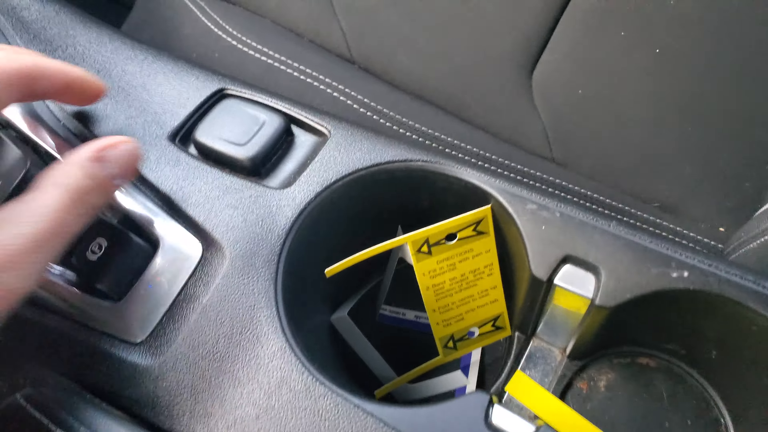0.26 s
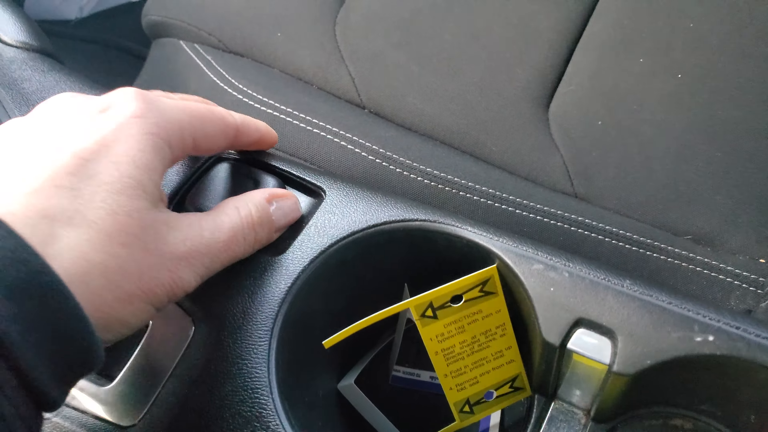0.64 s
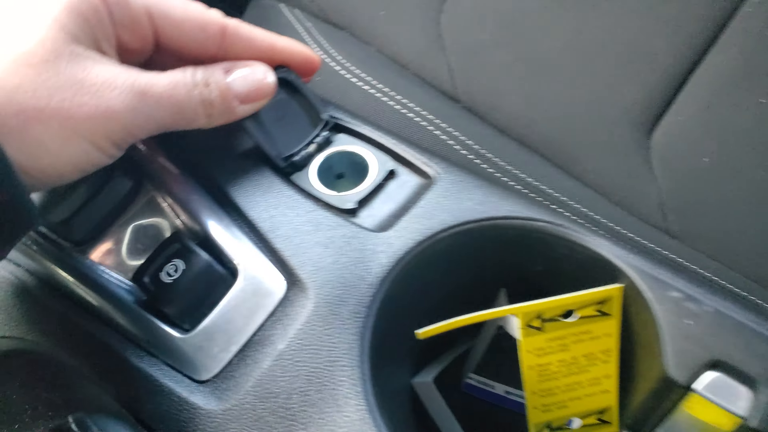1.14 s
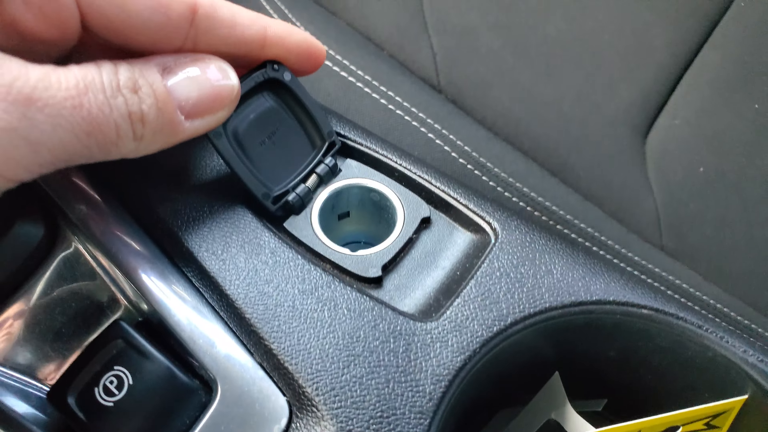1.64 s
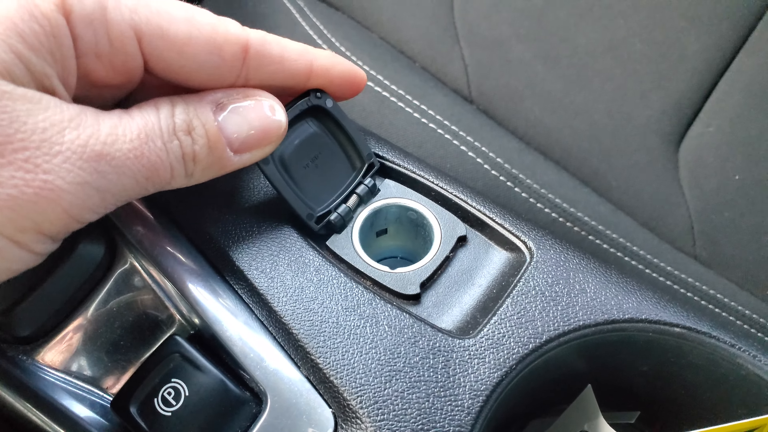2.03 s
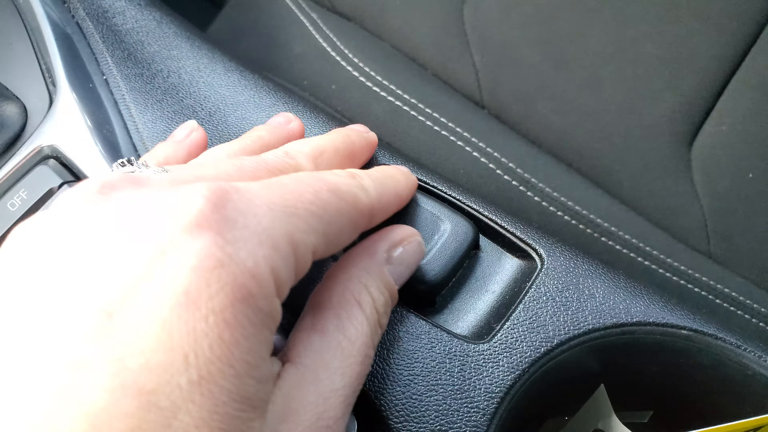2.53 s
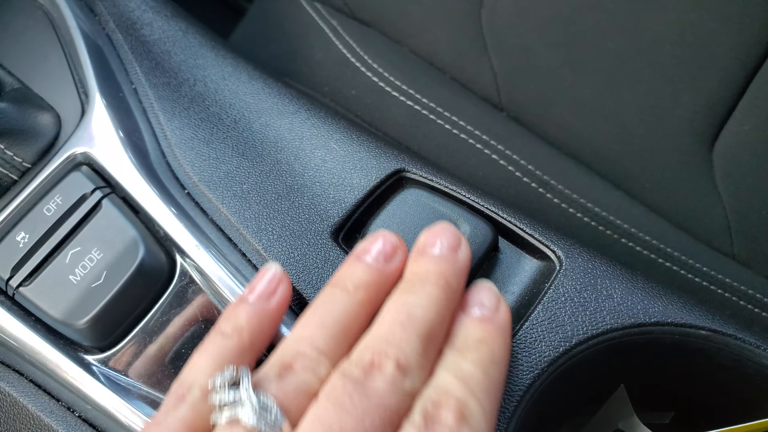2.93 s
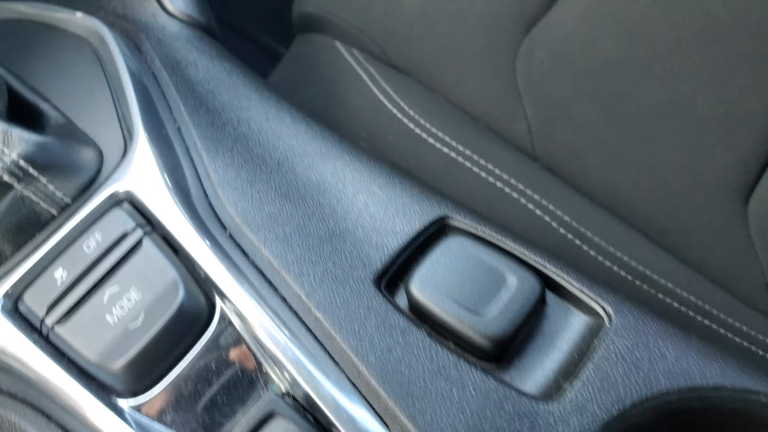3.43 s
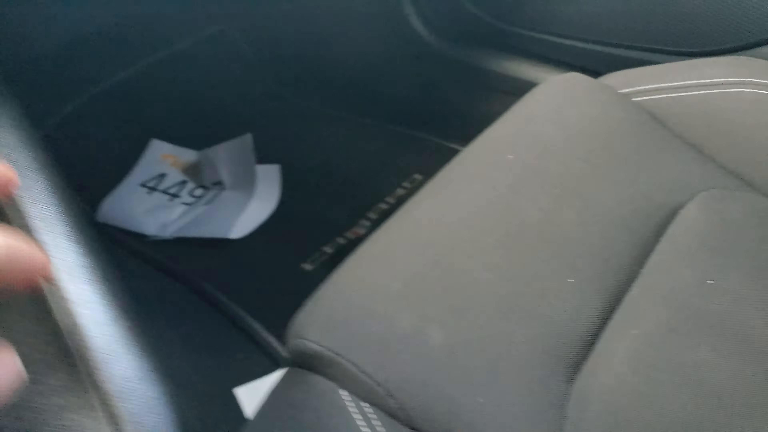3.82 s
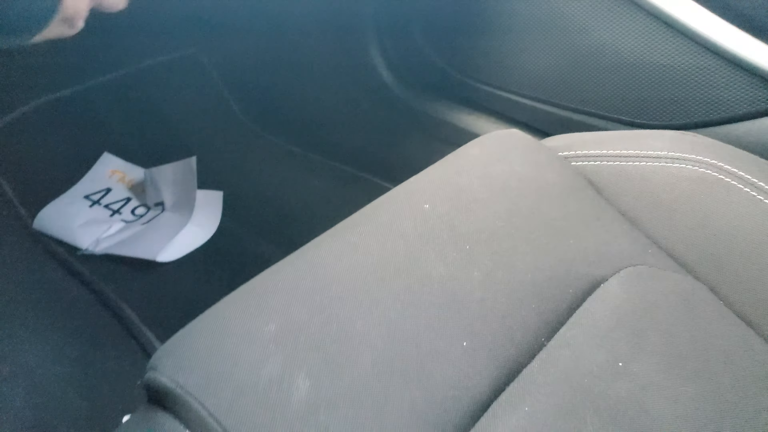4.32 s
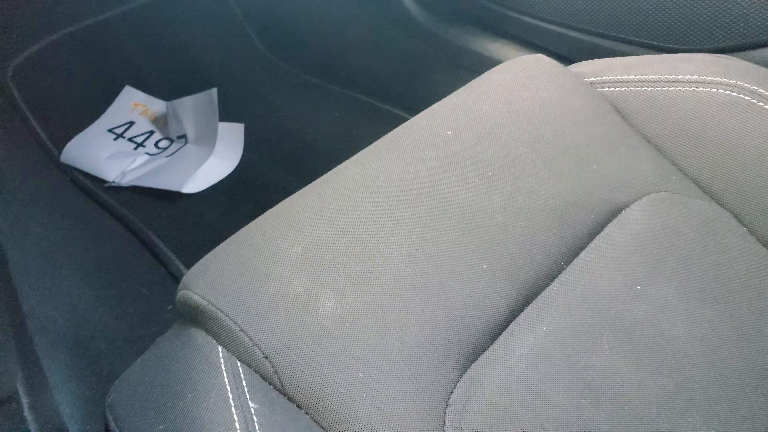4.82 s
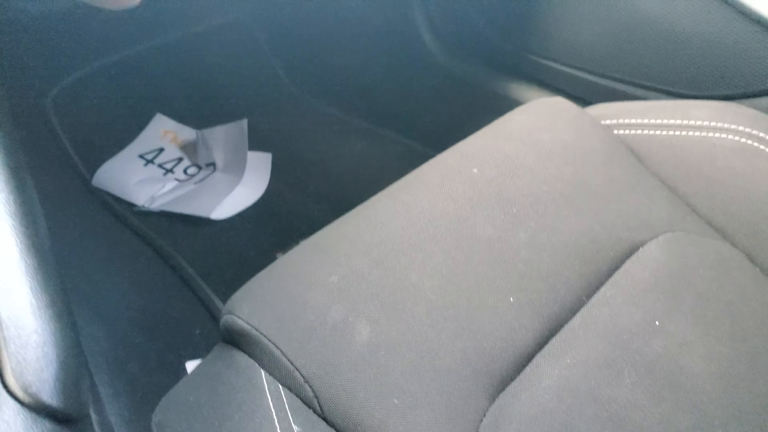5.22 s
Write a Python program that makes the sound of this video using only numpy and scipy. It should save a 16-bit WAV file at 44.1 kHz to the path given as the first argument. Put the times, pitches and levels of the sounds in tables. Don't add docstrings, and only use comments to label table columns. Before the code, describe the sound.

A low engine hum fills a car cabin while fingers rub plastic, a small lid clicks open, snaps shut loudly, then a hand thuds and knocks.

```python
import sys
import numpy as np
from scipy import signal
from scipy.fft import rfft, irfft, next_fast_len
from scipy.io import wavfile
from scipy.ndimage import uniform_filter1d

SR = 44100
rng = np.random.default_rng(int(sys.argv[2]) if len(sys.argv) > 2 else 0)


def master_out(mix):
    frames = np.transpose(np.atleast_2d(mix))
    ceiling = np.clip(frames, -1, 1)
    pcm = np.round(ceiling * 32767).astype(np.int16)
    wavfile.write(sys.argv[1], SR, pcm)


def voltage_ratio(decibels):
    exponent = np.asarray(decibels, float) / 20
    return 10 ** exponent


N = 241006
T = np.arange(N) / SR
COARSE = 64
FAST = next_fast_len(N)


def level(x, db):
    return x * voltage_ratio(db) / np.sqrt(np.mean(x ** 2))


def shape(table, size):
    hz, value = np.transpose(table)[:2]
    bins = np.arange(size // 2 + 1) * SR / size
    return np.interp(np.log(bins + 1), np.log(hz), value)


def band(x, lo_hz, hi_hz, order=3):
    return signal.sosfilt(signal.butter(order, [lo_hz, hi_hz], "band", fs=SR, output="sos"), x)


def walk(rate):
    k = int(SR / rate)
    steps = np.repeat(rng.standard_normal(N // 300), k)[:N]
    return 1.262 * uniform_filter1d(uniform_filter1d(steps, k), k)


def pan(db):
    return voltage_ratio(np.array([db / 2, -db / 2]))


def pair(likeness):
    mid, side = rng.standard_normal((2, N))
    return np.sqrt((1 + likeness) / 2) * mid + np.sqrt((1 - likeness) / 2) * side * np.array([[1], [-1]])


def ports(size, alike_hz):
    mid, side = rng.standard_normal((2, size))
    side = signal.sosfilt(signal.butter(2, alike_hz, "high", fs=SR, output="sos"), side)
    return np.array([mid + side, mid - side])


def ramp(span):
    return np.interp(T, span, (0, 1))


def swell(s, rise, fall, db):
    t = T[::COARSE]
    return voltage_ratio(2 * (db - 20 * np.maximum((s - t) / rise, (t - s) / fall)))


def drag(start, end, db):
    t = T[::COARSE]
    bite_s, let_go_s = .005, .02
    outside = np.maximum((start - t) / bite_s, (t - end) / let_go_s)
    return voltage_ratio(2 * (db - 20 * np.maximum(outside, 0)))


def smooth(power):
    return np.interp(T, T[::COARSE], np.sqrt(power))


def add(out, s, sound):
    i = int(s * SR)
    out[:, i:i + sound.shape[1]] += sound[:, :N - i]


def engine():
    # t/s, firing rate/Hz
    firing = [
        (0, 36.8),
        (.6, 37.0),
        (1.4, 37.15),
        (1.85, 37.3),
        (2.2, 36.7),
        (3.8, 36.5),
        (4.6, 36.85),
        (5.46, 36.9),
    ]
    # multiple, level/dB, unsteadiness/dB
    orders = [(.5, -29.5, 6.5), (1., 1.5, 0.5), (1.5, -24.5, 2), (2., -10, 2), (2.5, -25.5, 4),
              (3., -17, 0.5), (3.5, -23.5, 2.5), (4.5, -18, 3), (5., -33.5, 3.5)]
    # f/Hz, level/dB
    rumble_colour = [(18, -16), (26, -9.5), (48, -6), (65, -8), (135, -16), (165, -18.5), (228, -23),
                     (330, -24.5), (432, -25.5), (560, -32.5), (741, -39.5), (864, -37), (1000, -49),
                     (1600, -63)]
    # f/Hz, likeness (1 = the same)
    likeness = [(60, 0.92), (130, 0.7), (290, 0.86), (640, 0.37), (1410, -1.3), (3100, -0.61),
                (6820, -0.32), (15000, 0.01)]
    hum_db, rumble_db = -37, -42.5

    speed = np.interp(T, *np.transpose(firing)) * (1 + .0015 * walk(3))
    phase = 2 * np.pi * (np.cumsum(speed / SR) + .665)
    hum = 0
    for k, db, wobble_db in orders:
        hum = hum - voltage_ratio(db + wobble_db * walk(9)) * np.cos(k * phase + .07 * k * walk(6))
    console_boom_db, seat_boom_db = -15, -10.5
    boom_db = console_boom_db + (seat_boom_db - console_boom_db) * ramp((2, 2.3))
    hum = hum - voltage_ratio(boom_db + 1.4 * walk(10)) * np.cos(4 * phase + 0.49)

    colour = voltage_ratio(shape([*rumble_colour, (6000, -88)], FAST))
    like = np.clip(shape(likeness, FAST), 0, 1)
    mid = irfft(rfft(rng.standard_normal(FAST)) * colour * np.sqrt(1 + like), FAST)[:N]
    side = irfft(rfft(rng.standard_normal(FAST)) * colour * np.sqrt(1 - like), FAST)[:N]
    puffs = voltage_ratio(0.9 * np.cos(phase) + 1.7 * walk(8.7))
    rumble = np.array([mid + side, mid - side]) * puffs
    return np.sqrt(2) * voltage_ratio(hum_db) * hum + level(rumble, rumble_db)


def hiss():
    return level(band(pair(0), 10500, 17000, order=1), -87)


def gain_db():
    # t/s, depth/dB, hold/s, recovery time constant/s
    ducks = [
        (-.1, 3.4, .05, .25),
        (2.394, 13.7, 1.1, .4),
        (4.75, 3.2, .8, .4),
    ]
    creep_db_s, attack_s = 1.5, .016
    console_db, cushion_db = 1.1, 5
    db = console_db + (cushion_db - console_db) * ramp((3.9, 4.7))
    for s, depth_db, hold, release in ducks:
        held = depth_db - creep_db_s * np.clip(T - s, 0, hold)
        onset = ramp((s - attack_s / 2, s + attack_s / 2))
        db = db - held * onset * np.exp(-np.maximum(T - s - hold, 0) / release)
    return db


def strokes(grain):
    # peak t/s, 20 dB rise/s, 20 dB fall/s, level/dB, brightness/dB
    palm = [
        (.11, 0.18, 0.26, -66, -1),
        (.28, 0.34, 0.25, -71, 3.5),
        (1.13, 0.15, 0.45, -70, 3),
        (1.4, 0.28, 0.33, -67, -3),
        (1.8, .8, 0.89, -76.5, 4),
        (2.2, .2, 0.31, -70, -3),
    ]
    finger = [(.375, 0.021, 0.15, -61.5, 10.5), (.40, .012, .1, -56, -2), (.425, 0.05, 0.07, -53, -4),
              (.585, 0.05, .13, -58, -1), (.70, .03, 0.14, -65.5, 10), (.75, 0.13, 0.075, -62, 9),
              (.85, 0.044, 0.073, -72.5, 3), (.95, 0.04, 0.15, -64, 9), (1.0, 0.091, 0.1, -60, 6),
              (2.17, .04, 0.078, -72, 3.5), (2.33, .05, 0.088, -65, 3.5), (2.37, 0.076, 0.078, -57.5, 5.5),
              (2.5, .08, 0.085, -74.5, 1), (2.68, .08, 0.22, -83, 6)]
    sleeve = [
        (2.84, 0.12, 0.12, -69.5, -9),
        (2.9, .07, 0.46, -73, 3.5),
        (3.08, 0.18, 0.25, -69, 2.5),
        (3.17, 0.21, 0.16, -69, 6),
        (3.44, .45, .07, -83, 10),
    ]
    seat = [(3.61, .12, 0.35, -70.5, -3), (3.92, 0.38, 0.69, -61, -8.5), (4.14, 0.48, 0.73, -58, -6.5),
            (4.245, .012, .5, -63, 9), (4.3, 0.15, .5, -59, 3), (4.4, 0.22, .4, -59, 0),
            (4.52, 0.38, 0.25, -56.5, 0), (4.68, .1, 0.089, -48.5, -3), (4.9, 0.094, 0.29, -61.5, 2),
            (5.02, .15, .15, -66, 8), (5.06, 0.08, .15, -55, -3), (5.15, 0.11, 0.18, -64.5, -2),
            (5.29, 0.13, 0.24, -61.5, -3), (5.35, 0.12, .1, -59.5, 7), (5.46, 0.22, .2, -60, -12)]
    # body, drag, scrape, hiss, air level/dB, then left minus right/dB
    palm_mix, finger_mix = (0.4, -10.5, -9.5, -14.5, -12, 0.5), (0.9, -13.5, -4, -7, -9, 1.5)
    sleeve_mix, seat_mix = (-0.5, -9, -6.5, -7.5, 2, -0.8), (.1, -5, -6, -8, -6.5, 0)
    bright_share = (0, .15, .35, .9, 1)
    # f/Hz, width/Hz, level/dB
    skin = [
        [(1300, 710, -0.58), (787, 780, 0.076)],
        [(1940, 600, -1), (2580, 820, 0)],
        [(3490, 1100, -0.97), (4300, 820, -1)],
        [(6470, 1500, 0), (5300, 950, -5.5), (7600, 1000, -14)],
        [(10760, 3000, 0.5), (13800, 5600, 0.5), (9500, 500, -7.5)],
    ]

    materials = [(finger, finger_mix), (sleeve, sleeve_mix), (seat, seat_mix), (palm, palm_mix)]
    slips, bins = rfft(grain, FAST), np.arange(FAST // 2 + 1) * SR / FAST
    out = 0
    for k, peaks in enumerate(skin):
        power = sum(voltage_ratio(2 * g) / (1 + (2 * (bins - hz) / width) ** 2) ** 2 for hz, width, g in peaks)
        effort = 0
        for rows, mix in materials:
            sides = pan(mix[-1])[:, None] ** 2
            for *stroke, bright_db in rows:
                part_db = mix[k] + bright_share[k] * bright_db
                effort = effort + sides * voltage_ratio(2 * part_db) * swell(*stroke)
        ringing = level(irfft(slips * np.sqrt(power), FAST)[:, :N], 0.64)
        out = out + np.array([smooth(e) for e in effort]) * voltage_ratio(1.8 * walk(35)) * ringing
    return out


def squeaks(grain):
    # peak t/s, 20 dB rise/s, 20 dB fall/s, level/dB, f/Hz
    songs = [(.112, .02, .3, -64, 1350), (.2, .5, 0.36, -76, 3300), (.6, .06, .1, -62, 1300),
             (.74, 0.17, .3, -63.5, 1100), (1.35, .5, .6, -84, 5000), (2.5, .1, 0.15, -76.5, 2705),
             (2.9, .25, 0.28, -72, 3200), (2.97, .3, .25, -72, 4100), (3.62, .12, 0.22, -71, 2900)]
    out = np.zeros((2, N))
    for *stroke, hz in songs:
        hollow = signal.lfilter(*signal.iirpeak(hz, 1 / .11, fs=SR), grain)
        out += smooth(swell(*stroke)) * voltage_ratio(1.9 * walk(30)) * level(hollow, 0)
    return out


def scrapes(grain):
    # start t/s, end t/s, level/dB, f/Hz
    drags = [(.396, .414, -48, 1370), (.42, .443, -53, 1400), (.396, .44, -62, 4400),
             (.396, .435, -62, 2700), (2.161, 2.18, -66, 6400), (.435, .465, -66, 6600),
             (.606, .614, -58, 1350), (.624, .645, -62, 3200), (.624, .64, -54, 900),
             (.563, .573, -54, 4600), (.563, .573, -52, 1250), (.563, .57, -58, 6800),
             (.575, .615, -64, 4100), (.68, .79, -66, 6600), (.68, .72, -66, 4200), (.955, 1.0, -63, 6300),
             (.955, 1.012, -63, 4000), (.973, .992, -64, 10300), (1.2, 1.28, -77, 3300),
             (1.22, 1.45, -78, 6700), (1.22, 1.42, -82, 11000), (1.49, 1.58, -80, 6500),
             (2.36, 2.382, -65, 6500), (2.36, 2.384, -62, 10200), (3.0, 3.12, -74, 4200),
             (3.03, 3.16, -74, 1600), (3.235, 3.245, -66, 5600), (3.59, 3.67, -76, 3000),
             (4.39, 4.42, -56, 2600), (4.4, 4.422, -58, 5000), (4.641, 4.647, -49, 2700),
             (4.641, 4.65, -52, 1100), (4.672, 4.687, -55, 2700), (4.69, 4.696, -56, 11500),
             (1.03, 1.12, -66, 3000), (1.04, 1.13, -68, 1400), (.78, 1.0, -64, 800),
             (4.686, 4.698, -47, 3800), (4.69, 4.698, -45, 1900), (4.41, 4.5, -58, 1500),
             (4.0, 4.2, -63, 1500), (5.056, 5.064, -50, 1400)]
    out = np.zeros((2, N))
    for start, end, db, hz in drags:
        near = slice(max(int((start - 1 / 8) * SR), 0), int((end + 1 / 4) * SR))
        hollow = signal.lfilter(*signal.iirpeak(hz, 1 / .12, fs=SR), grain[:, near])
        effort = smooth(drag(start, end, db)) * voltage_ratio(1.8 * walk(120))
        out[:, near] += effort[near] * level(hollow, 0)
    return out


def rub():
    slip_db = np.minimum(1.8 * rng.exponential(size=N), 12)
    grain = pair(.1) * voltage_ratio(slip_db + 1.1 * walk(70))
    return strokes(grain) + squeaks(grain) + scrapes(grain)


def ticks(events, octaves, edge_db, t60):
    out, t = np.zeros((2, N)), T[:4096]
    spike_db, spike_s = 2, .001
    for s, db, hz, *pan_db in events:
        crack = ports(4096, 600.0)
        fall = voltage_ratio(-60 * t / t60) + voltage_ratio(spike_db) * np.exp(-t / spike_s)
        fall = fall * np.minimum(t / 0.00046, 1)
        half = 2 ** (octaves / 2)
        core = band(crack * fall, hz / half, hz * half, order=2)
        edge = band(crack, 1200, 15000) * fall
        tick = core / np.abs(core).max() + voltage_ratio(edge_db) * edge / np.abs(edge).max()
        add(out, s, tick * voltage_ratio(db + 2.5) * pan(sum(pan_db))[:, None])
    return out


def small_contacts():
    # t/s, peak level/dB, centre f/Hz, left minus right/dB if off centre
    ping_events = [(.107, -46, 1330, 2), (.397, -36, 1370), (.425, -41.5, 1450), (2.240, -54.5, 1300),
                   (3.199, -46, 5400), (4.241, -32, 4300, 8), (5.248, -47.5, 4000)]
    creak_events = [(.564, -44, 4580, 2.5), (.709, -43.5, 6640), (2.161, -52, 6400), (2.165, -59, 3300),
                    (4.398, -39, 2900), (4.41, -39, 4800), (4.578, -41, 3370)]
    tap_events = [(.415, -36.5, 220), (.427, -32.5, 294), (.440, -38, 230), (.455, -38, 294),
                  (.563, -33.5, 400), (.570, -36, 300), (.623, -34, 605), (.627, -40, 260),
                  (1.016, -35, 310), (2.396, -36.5, 380), (4.6905, -22, 300)]
    dull_events = [(.565, -40, 1300), (.625, -42, 1200), (2.381, -31, 915), (2.380, -38, 3000),
                   (2.781, -49, 3200), (2.782, -54, 900), (3.195, -52.5, 1960), (3.226, -49, 1900),
                   (3.228, -51, 700), (3.717, -43, 1100), (4.242, -37, 2100), (4.6405, -33, 1300),
                   (4.974, -39, 694)]
    click_events = [(.840, -54.5, 6000), (1.1955, -54, 4000, -2), (3.941, -48, 5500),
                    (4.022, -33, 2660, -4.5), (4.539, -35, 3600, 14), (5.0655, -15, 4200),
                    (4.9735, -27, 3000, -3.5), (4.974, -35, 6200, -3), (4.9728, -39, 10300, -3),
                    (5.105, -50, 12500)]
    # width/octaves, edge level/dB, 60 dB fall/s
    ping, creak, tap, thock, click = (0.25, -16, 0.035), (0.97, -11, 0.093), (1.05, -23, .075), (0.97, -21, 0.025), (0.99, -3,
                                                                                               .032)
    out = ticks(tap_events, *tap) + ticks(ping_events, *ping) + ticks(dull_events, *thock)
    return out + ticks(click_events, *click) + ticks(creak_events, *creak)


def grip():
    # peak t/s, 20 dB rise/s, 20 dB fall/s, level/dB, creak over thump/dB
    shakes = [
        (.46, .3, .45, -37.5, -13),
        (3.84, .4, 1, -44, -8),
        (4.13, 0.76, 0.97, -46, 0),
        (4.262, 0.28, 0.64, -36, -20),
        (4.95, 0.34, .3, -49.5, 3.5),
        (5.112, 0.18, .17, -36, -8.5),
    ]
    thump = smooth(sum(swell(*stroke) for *stroke, _ in shakes))
    creak = smooth(sum(swell(*stroke) * voltage_ratio(2 * creak_db) for *stroke, creak_db in shakes))
    return thump * level(band(pair(.8), 55, 130), -5.5) + creak * level(band(pair(0.81), 193, 516), -4.5)


def swings():
    # t/s, f/Hz, level/dB, 60 dB fall/s
    panels = [(4.700, 115, -15, 0.21), (4.751, 97.8, -12, 0.11), (4.766, 106.7, -17.5, 0.13),
              (4.72, 62, -23, .3), (4.80, 48, -23, .3), (4.80, 66.3, -24, .2), (4.885, 66, -29.5, 0.17),
              (5.068, 105, -21, 0.146), (5.105, 78, -23.5, 0.21), (5.10, 120, -30.5, 0.22),
              (5.066, 195., -23.5, 0.11), (3.63, 94, -29, 0.14), (5.4, 105., -34.5, 0.23),
              (.420, 213, -31, 0.14), (0.41, 240, -39, .1), (.563, 276, -36.5, .08),
              (.563, 820., -41.5, 0.068), (0.73, 280., -38, 0.073), (0.72, 560, -45, 0.047),
              (2.395, 250., -38.5, 0.12)]
    out, t = np.zeros((2, N)), T[:SR // 2]
    for s, hz, db, t60 in panels:
        swing = np.sin(2 * np.pi * hz * t + np.array([[-.2], [.2]]))
        rise = np.minimum(t * hz, 1)
        add(out, s, voltage_ratio(db - 60 * t / t60) * rise * swing)
    return out


def blows(events, tone, modes, ring_db, tail_db, tail_s, tail_hz):
    out, t = np.zeros((2, N)), T[:8192]
    hardest_db = max(row[1] for row in events)
    for s, db, contact_ms, pan_db in events:
        rough = level(irfft(rfft(ports(8192, 700.)) * voltage_ratio(shape(tone, 8192)), 8192), 0)
        push = np.minimum(t / .0002, 1) * np.exp(-1000 * t / contact_ms)
        bell = 0
        for hz, g, t60 in modes:
            start = rng.random((2, 1)) * min(hz / 4500, 1)
            bell = bell + voltage_ratio(g - 60 * t / t60) * np.sin(2 * np.pi * (hz * t + start))
        bell = voltage_ratio(ring_db + 2 * (db - hardest_db)) * bell / np.abs(bell).max()
        tail_fall = voltage_ratio(tail_db - 60 * t / tail_s) * np.minimum(t / 0.0054, 1)
        tail = tail_fall * band(rough, 100, tail_hz, order=1)
        add(out, s, (rough * push + tail + bell) * voltage_ratio(db - 3.5) * pan(pan_db)[:, None])
    return out


def lid():
    # t/s, peak level/dB, contact/ms, left minus right/dB
    latch = [
        (1.0147, -13.5, 1.92, 1),
    ]
    snap = [
        (2.3935, -3.5, 0.6, 0.),
    ]
    rattle = [
        (2.4074, -12.5, 1.1, -.5),
        (2.4105, -24, 2.5, -.5),
        (2.4146, -14.5, 0.9, -2.),
        (2.4185, -17, 1.2, -1.),
        (2.4215, -24, 3, 0.),
    ]
    # f/Hz, level/dB
    latch_tone, snap_tone, rattle_tone = [(500, -30), (950, -21.5), (1200, -8), (1850, -24), (2300, -27),
                                          (3560, -5), (4100, -13), (4800, -10), (6500, -20), (15000, -46.5),
                                          (16500, -46)], [(290, -41.5), (500, -15), (1350, -8.5),
                                                              (1790, -7.5), (3660, -3), (8060, -14),
                                                              (10500, -1.5), (14900, -7), (16500, -23)], [(290, -41), (500, -10.5),
                                                                                 (1370, -6.5), (1920, -19),
                                                                                 (2540, -3.5), (3880, -1.5),
                                                                                 (6960, -11), (10300, -11),
                                                                                 (15300, -16.5),
                                                                                 (16500, -31.5)]
    # f/Hz, level/dB, 60 dB fall/s
    latch_modes, snap_modes, rattle_modes = [(3560, 3, 0.045), (3960, -6, .035), (3090, -6.5, 0.044),
                                             (4680, -7, .03), (1127, -18, .03), (1730, -17.5, .03)], [(3272, 1, 0.016), (10380, 3, 0.0098),
                                                                  (4450, -8, .012)], [(2640, 1, .06),
                                                                                      (3900, -5, .05),
                                                                                      (6400, -5, .05)]
    out = blows(latch, latch_tone, latch_modes, -10, -15.5, 0.056, 12000.)
    out = out + blows(snap, snap_tone, snap_modes, -2, -17, 0.1, 15000.)
    out = out + blows(rattle, rattle_tone, rattle_modes, -15, -14, .17, 7000.)
    stilled_s = 2.447
    return out * np.clip((stilled_s - T) / .025, 0, 1) ** 2


def hand():
    # t/s, peak level/dB, contact/ms, left minus right/dB
    thud = [
        (4.691, -28, 5.4, 1.4),
        (4.6995, -12, 2.5, 3.4),
        (4.7025, -12, 3, 2.),
        (4.707, -16, 3, 2.),
        (4.737, -41, 5., 2.),
    ]
    knock = [
        (5.0642, -6, 2, -0.91),
        (5.0658, -3.5, 2.5, .3),
        (5.068, -4, 2, 0.3),
        (5.0715, -6.5, 2, 0.3),
        (5.0745, -12, 2.5, 0.3),
    ]
    # f/Hz, level/dB
    thud_tone, knock_tone = [(120, -52), (220, -6), (542, -13), (1050, -15), (3190, -24.5), (4700, -33.5),
                             (5160, -36.5), (13000, -48), (16500, -53)], [(210, -33), (290, -11.5), (430, -2), (560, -2), (700, -9),
                                                (1000, 0), (1300, -3), (1550, -3.5), (2230, -16),
                                                (4190, -6), (4920, -18.5), (12000, -31), (16500, -44.5)]
    # f/Hz, level/dB, 60 dB fall/s
    thud_modes, knock_modes = [(980, -2, 0.048), (1480, 1, 0.03), (431, 1.5, 0.073), (2400, -12, 0.041)], [(430, 0, 0.075), (779, 1, 0.07), (1013, 2, 0.055),
                                                   (1190, 4.5, 0.045), (610, -1, .06), (1548, 1, 0.045),
                                                   (1827, -5, .035), (2420, -6, .03), (2900, -3, .03),
                                                   (4250, 0, 0.028)]
    out = blows(thud, thud_tone, thud_modes, -2, -12, .065, 3500.)
    return out + blows(knock, knock_tone, knock_modes, -1, -19, 0.065, 3000.)


def scene():
    background = (engine() + hiss()) * voltage_ratio(gain_db())
    return background + rub() + small_contacts() + grip() + swings() + lid() + hand()


def low_pass(x):
    return signal.sosfilt(signal.butter(12, 16620, fs=SR, output="sos"), x)


def record(dry):
    x = signal.sosfilt(signal.butter(1, 8, "high", fs=SR, output="sos"), dry)
    x = signal.sosfilt(signal.ellip(5, .3, 22, 15700, fs=SR, output="sos"), x)
    return low_pass(np.clip(x, -1, 1))


dry = scene()
out = record(dry)
master_out(out)
```